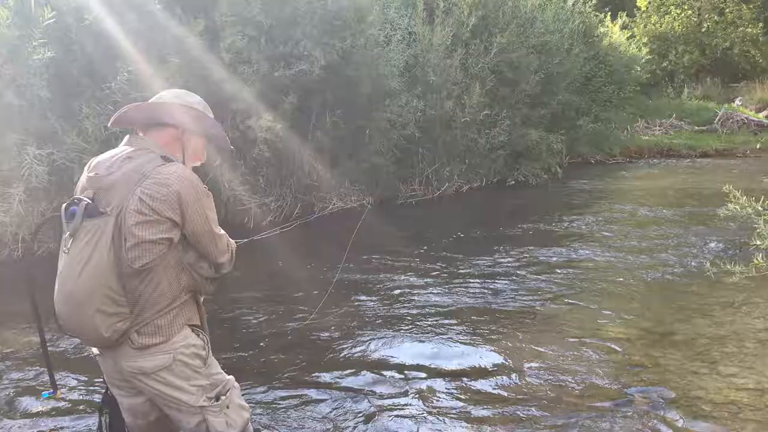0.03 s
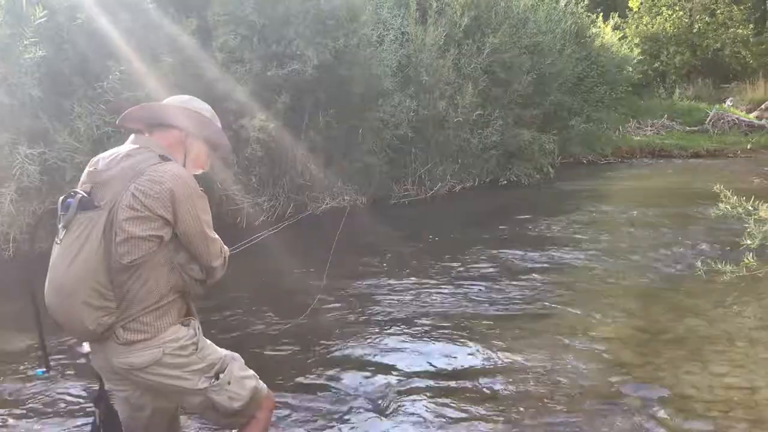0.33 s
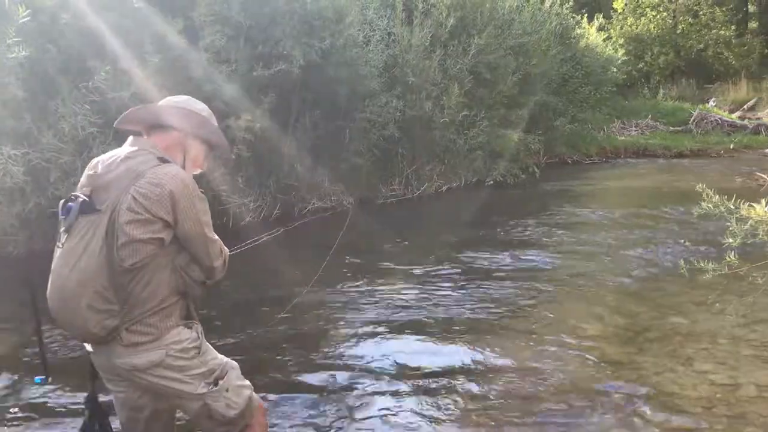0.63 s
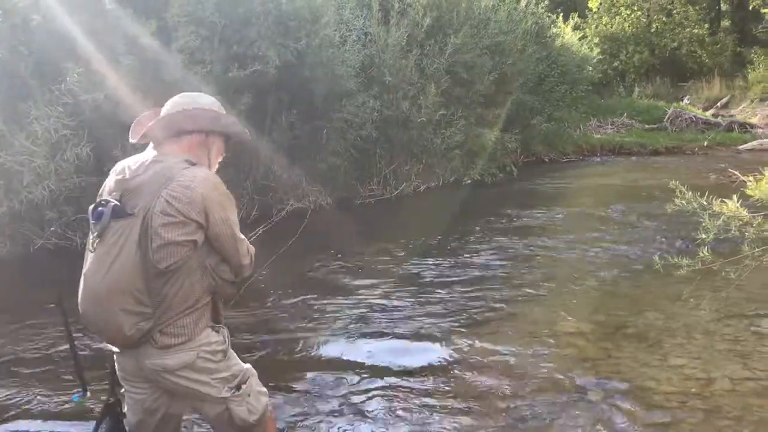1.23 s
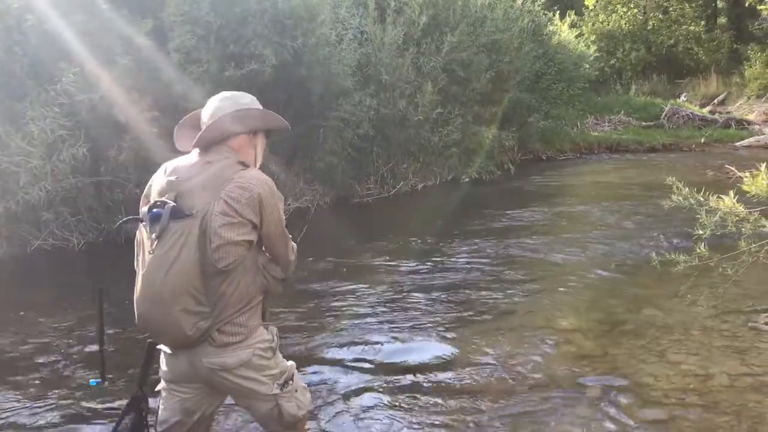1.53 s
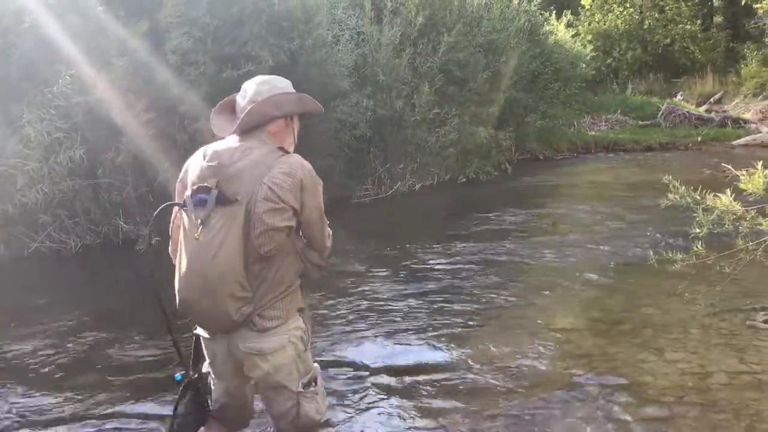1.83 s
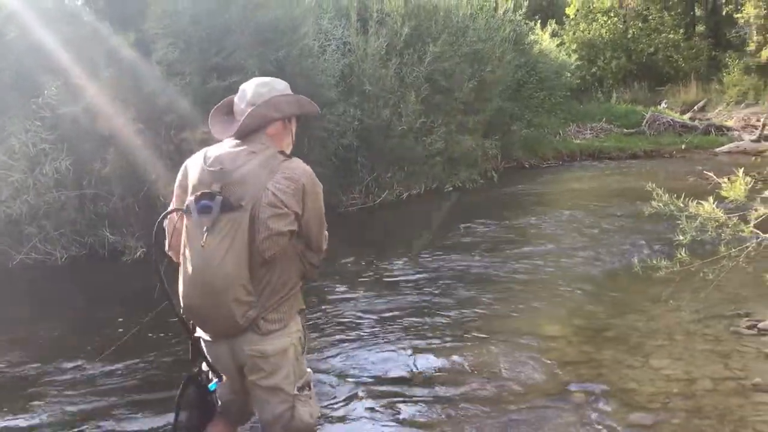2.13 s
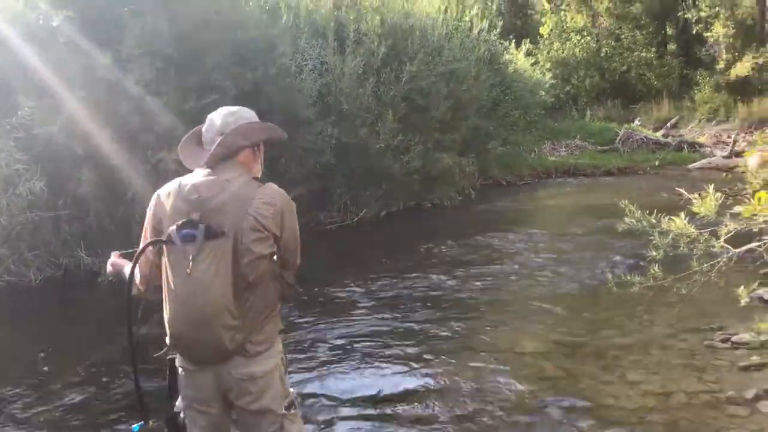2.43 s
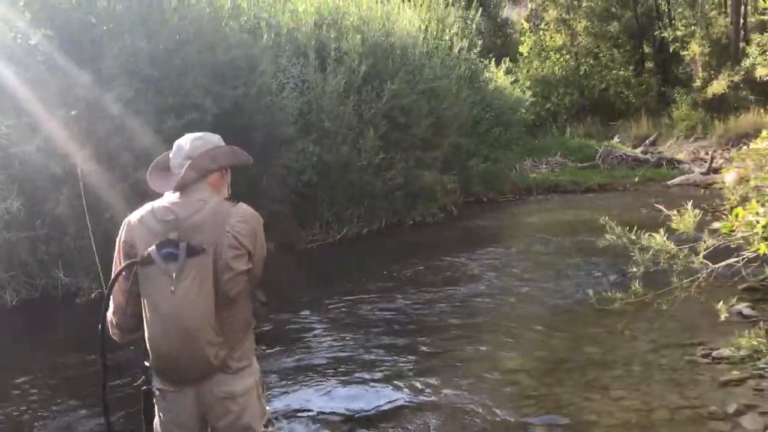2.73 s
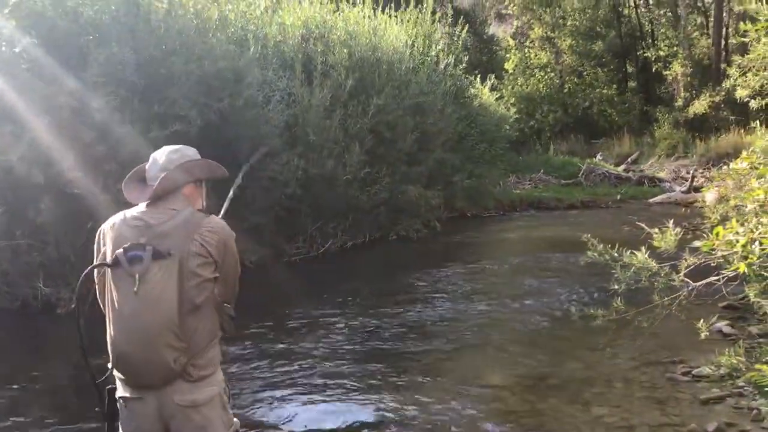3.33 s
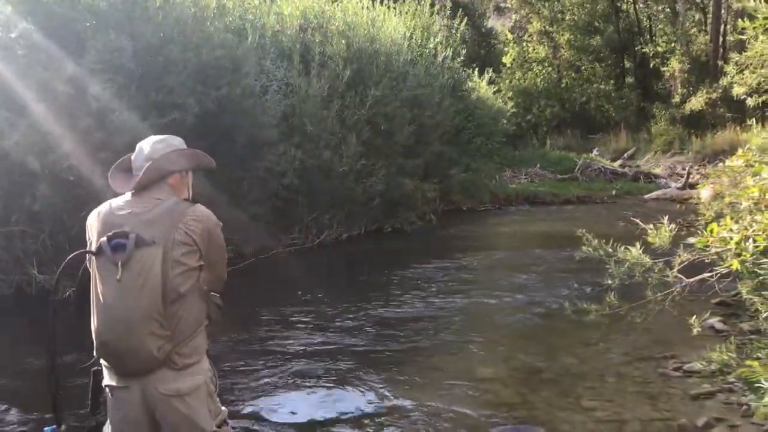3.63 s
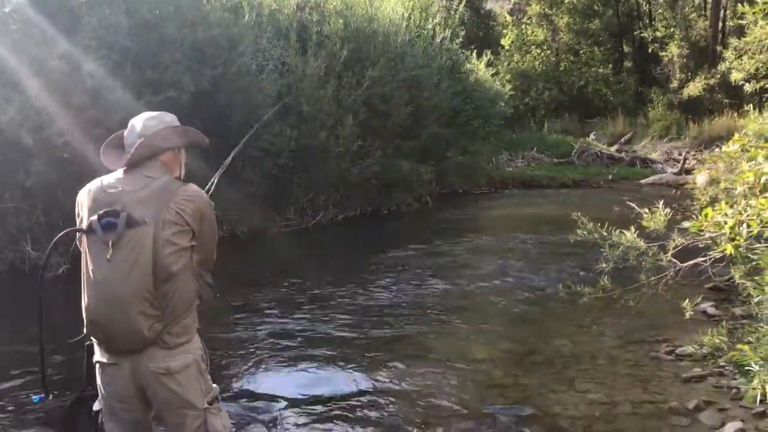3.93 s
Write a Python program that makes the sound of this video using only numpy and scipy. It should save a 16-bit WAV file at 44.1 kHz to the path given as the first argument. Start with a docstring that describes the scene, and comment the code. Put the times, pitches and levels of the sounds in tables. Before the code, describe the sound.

Shallow river water flows close by, bubbling and lightly splashing, with a single knock near the end.

```python
"""Shallow river and a knock

A shallow river rushes past, close by: merged splashes make a bed of fine noise, small bubbles ring in it,
foam crackles on top and a hollow drone sits underneath. Now and then the water plops, spits a drop or
sloshes. Late on, something hard knocks once near the microphone, and the gain ducks and creeps back."""
import sys
import numpy as np
from scipy import signal
from scipy.fft import rfft, irfft
from scipy.io import wavfile

SR = 44100
rng = np.random.default_rng(int(sys.argv[2]) if len(sys.argv) > 2 else 0)


def generate_wav(sig):
    """Save sig (samples, or channels by samples) to the path in sys.argv[1] as 16-bit PCM at SR."""
    pcm = np.round(np.clip(np.atleast_2d(sig).T, -1, 1) * 32767).astype(np.int16)
    wavfile.write(sys.argv[1], SR, pcm)


N = 176400
TIME = np.arange(N) / SR
FREQS = np.maximum(np.arange(N // 2 + 1) * SR / N, 1)

# strength of the current: time_s, level_db
FLOW_LEVEL = [(.12, -48.5), (.3, -47), (.55, -44), (.67, -45.5), (.78, -45.5), (.95, -44.5), (1.1, -47),
              (1.45, -46.5), (1.9, -47.5), (2.2, -47.5), (2.45, -45), (2.75, -46.5), (3.1, -48), (3.4, -48),
              (4, -49)]
# tone colour of the rush: frequency_hz, relative_db
RUSH_SPECTRUM = [(20, -42), (33, -27), (50, -9), (100, -3.5), (150, -19.5), (210, 1.5), (330, -1.5),
                 (480, -5.5), (620, -.5), (1050, 0), (1600, -3), (2500, -7), (4000, -11), (6300, -17.5),
                 (9000, -20.5), (13000, -23), (16000, -30)]
# strength of the small bubbles by pitch: pitch_hz, relative_db
BUBBLE_SPECTRUM = [(300, -5), (600, -1.5), (1100, 0.5), (2500, -3.5), (6000, 2)]
# rise and fall of the foam's crackle: time_s, level_db
FOAM_LEVEL = [(.12, -76), (.55, -56.5), (.95, -56.5), (1.15, -63.5), (1.47, -61), (1.85, -71), (2.05, -58),
              (2.15, -61.5), (2.33, -54.5), (2.7, -57.5), (3.1, -64.5), (3.45, -60.5), (4, -70)]
# resonances of the drone: centre_hz, width_hz, relative_db
DRONE_RESONANCES = [(93.7, 15, -9), (227.5, 51.5, 1)]
# fader over those resonances: time_s, gain_db
DRONE_FADER = [(.12, -62), (.85, -59.5), (1.2, -58.5), (2.1, -60.5), (2.8, -56.5), (3.25, -52),
               (3.45, -52.5), (4, -50.5)]
# single large bubbles: start_s, pitch_hz, level_db, t60_s
LARGE_BUBBLES = [(.177, 601, -41.5, 0.14), (.72, 600, -37, .05), (.812, 206, -38.5, 0.16),
                 (.915, 920, -37, 0.035), (.925, 336, -37, 0.081), (1.615, 312, -31.5, 0.089),
                 (1.688, 1150, -33.5, 0.042), (2.045, 873, -28, 0.047), (2.176, 1000, -34, 0.051),
                 (2.297, 355, -33, 0.083), (2.346, 1130, -35.5, 0.061), (2.37, 293, -32.5, 0.11),
                 (2.39, 385, -36, 0.078), (2.646, 1530, -35, .035), (2.66, 583, -27, 0.035),
                 (2.964, 840, -33.5, 0.043)]
# drops of spray landing: start_s, level_db, centre_hz
SPRAY_DROPS = [(.28, -30.5, 2370), (0.315, -32, 2530), (0.343, -36, 3000), (.447, -34.5, 11000),
               (0.473, -35, 6000), (.546, -27, 5800), (.548, -30.5, 12900), (.573, -53, 6000),
               (.615, -34.5, 4800), (.711, -27, 2500), (0.969, -30.5, 1100), (1.6, -39.5, 9000),
               (1.62, -36, 3000), (1.77, -37, 13800), (2.0, -29.5, 2600), (2.03, -29.5, 3400),
               (2.042, -31, 4000), (2.053, -37, 3700), (3.2, -44, 12000), (3.405, -34, 4000)]
# folding wavelets: start_s, length_s, level_db, centre_hz
WAVELETS = [(0.418, 0.043, -46.5, 1200), (0.542, 0.044, -48.5, 4500), (.555, 0.031, -54, 1200),
            (.71, .07, -47, 1000), (0.854, 0.083, -48, 835), (1.441, 0.038, -49, 1180),
            (2.008, 0.042, -46.5, 1190), (2.285, 0.043, -44, 650), (2.31, .1, -48.5, 3000),
            (2.49, 0.12, -51.5, 440), (2.64, 0.03, -47, 1200)]
# the knock, a graze then the full blow; softer is duller: start_s, force_db, lowpass_hz, crack_db
KNOCK_CONTACTS = [(3.2956, -3.5, 1170, -22), (3.3007, 2.5, 9000, -21)]
# modes of the struck object: pitch_hz, gain_db, t60_s
BODY_MODES = [(250, -21.5, 0.0084), (657, -7.5, 0.012), (980, -9.5, 0.02), (1300, -18, 0.017),
              (1860, -14.5, 0.0092), (2330, -14, 0.0084), (2840, -15.5, 0.01), (3840, -17.5, 0.0088),
              (4250, -16, 0.0069), (5250, -18, 0.0077), (7070, -21.5, 0.0065)]
# dips in the microphone's response: centre_hz, width_hz, gain_db
MIC_NOTCHES = [(4920, 650, -3.5), (7650, 1100, -3), (10500, 690, -4.5)]


def from_db(db):
    """Decibels to gain."""
    return 10 ** (np.asarray(db) / 20)


def rms_one(x):
    """Scale to rms 1."""
    return x / np.sqrt(np.mean(x ** 2) + 1e-20)


def in_time(rows):
    """Read a level curve at every sample."""
    return np.interp(TIME, *np.transpose(rows))


def at_hz(points, hz):
    """Read a spectrum in dB on a log-frequency axis."""
    points_hz, db = np.transpose(points)
    return np.interp(np.log(hz), np.log(points_hz), db)


def noise(gains):
    """Noise coloured by a gain for each frequency, at rms 1."""
    return rms_one(irfft(rfft(rng.standard_normal(N)) * gains, N))


def drift(rate_hz):
    """A random wobble of rms 1, mostly slower than rate_hz."""
    return noise(1 / (1 + (FREQS / rate_hz) ** 2))


def hump(centre_hz, octaves):
    """A band shape whose gain halves this many octaves either side of its centre."""
    return 1 / (1 + (np.log2(FREQS / centre_hz) / octaves) ** 2)


def decay(start_s, t60_s):
    """An envelope that jumps to 1 and dies away."""
    return (TIME >= start_s) * from_db(-60 * np.clip((TIME - start_s) / t60_s, 0, 10))


def ring(clicks, hz, t60_s):
    """A resonator: each click sets off a dying sine."""
    radius, angle = from_db(-60 / (t60_s * SR)), 2 * np.pi * hz / SR
    return signal.lfilter([0, np.sin(angle)], [1, -2 * radius * np.cos(angle), radius ** 2], clicks + 1e-18)


def rush(flow_db, flicker_db=1.69, flicker_hz=18, shared_db=.5, brightening=.2, treble_hz=3000):
    """Countless merged splashes: half-octave bands flicker on their own, and stronger flow is brighter."""
    bed = rfft(noise(from_db(at_hz(RUSH_SPECTRUM, FREQS))))
    band = np.floor(2 * np.log2(np.maximum(FREQS, 150)))
    flutter_db = shared_db * drift(36)   # moves all bands together
    out = 0
    for k in np.unique(band):
        treble_share = 1 / (1 + (treble_hz / 2 ** (k / 2)) ** 2)
        swing_db = brightening * treble_share * (flow_db - flow_db.mean())
        gain = from_db(swing_db + flutter_db + flicker_db * drift(flicker_hz))
        out += gain * irfft(bed * (band == k), N)
    return from_db(flow_db) * rms_one(out)


def bubbles(flow_db, per_s=330, relative_db=-6.5, spread_db=2, t60_cycles=15, pitches=40):
    """Small bubbles are born at random, and each rings for a few cycles at its own pitch."""
    strengths = from_db(spread_db * np.minimum(rng.exponential(1, N), 4)) * rng.choice([-1, 1], N)
    births = strengths * (rng.random(N) < per_s / SR)
    pitch_index = rng.integers(0, pitches, N)
    out = 0
    for k, hz in enumerate(np.geomspace(300, 6000, pitches)):
        out += from_db(at_hz(BUBBLE_SPECTRUM, hz)) * ring(births * (pitch_index == k), hz, t60_cycles / hz)
    return from_db(flow_db + relative_db) * rms_one(out)


def foam(clicks_per_s=600, centre_hz=4500):
    """Foam bursts in a crackle of tiny bright clicks."""
    clicks = rng.standard_normal(N) * (rng.random(N) < clicks_per_s / SR)
    colour = 1 / (FREQS / centre_hz + centre_hz / FREQS)
    return from_db(in_time(FOAM_LEVEL)) * rms_one(irfft(rfft(clicks) * colour, N))


def drone():
    """Noise in two low resonances wavers beneath the rush, hollow and growing toward the end."""
    hollow = sum(from_db(db) * noise(1 / (1 + ((FREQS - hz) / width_hz) ** 2) ** 2)
                 for hz, width_hz, db in DRONE_RESONANCES)
    return from_db(in_time(DRONE_FADER)) * hollow


def plops(attack_s=.0018, rise_per_t60=.17):
    """Large bubbles ring and rise in pitch as they near the surface."""
    out = 0
    for start_s, hz, db, t60_s in LARGE_BUBBLES:
        age_s = np.maximum(TIME - start_s, 0)
        phase = 2 * np.pi * hz * age_s * (1 + .5 * rise_per_t60 * age_s / t60_s)
        envelope = (1 - np.exp(-age_s / attack_s)) * decay(start_s, t60_s)
        out += from_db(db) * envelope * np.sin(phase)
    return out


def spray(t60_s=.018, trim_db=-7.5):
    """Drops land with short ticks of noise, each around its own pitch."""
    return sum(from_db(db + trim_db) * decay(start_s, t60_s) * noise(hump(hz, octaves=.22))
               for start_s, db, hz in SPRAY_DROPS)


def sloshes(roughness_db=3):
    """Wavelets fold over: short rough swells of noise, each around its own pitch."""
    out = 0
    for start_s, length_s, db, hz in WAVELETS:
        progress = np.clip((TIME - start_s) / length_s, 0, 1)
        swell = np.sqrt(np.abs(np.sin(np.pi * progress)))
        colour = hump(hz, octaves=.86) / np.sqrt(1 + FREQS / hz)
        out += from_db(db) * swell * noise(colour)
    return out * from_db(roughness_db * drift(90))


def knock(crack_t60_s=.0074, crack_top_hz=12000):
    """Two contacts a few milliseconds apart strike heavily damped modes, each with a tiny crack."""
    force, crack_envelope = 0, 0
    for start_s, force_db, lowpass_hz, crack_db in KNOCK_CONTACTS:
        impulse = from_db(force_db) * (np.arange(N) == int(start_s * SR))
        softness = signal.butter(2, lowpass_hz, fs=SR, output="sos")
        force += signal.sosfilt(softness, impulse + 1e-18)
        crack_envelope += from_db(crack_db) * decay(start_s, crack_t60_s)
    body = sum((-1) ** k * from_db(db) * ring(force, hz, t60_s)   # modes alternate in polarity
               for k, (hz, db, t60_s) in enumerate(BODY_MODES))
    return body + crack_envelope * noise(1 / (1 + (FREQS / crack_top_hz) ** 4))


def ducking(x, threshold_db=-23.5, slope=.16, attack_s=.025, release_db_per_s=12):
    """Loud peaks pull the gain down; it creeps back at a steady rate."""
    level_db = 20 * np.log10(np.abs(x) + 1e-9)
    cut_db = slope * np.maximum(level_db - threshold_db, 0)
    recovery_db = release_db_per_s * TIME
    held_db = np.maximum.accumulate(cut_db + recovery_db) - recovery_db
    pole = np.exp(-1 / (attack_s * SR))
    return x * from_db(-signal.lfilter([1 - pole], [1, -pole], held_db))


def scene():
    """The river bed, its splashy accents and the knock, mixed in mono."""
    flow_db = in_time(FLOW_LEVEL)
    river = rush(flow_db) + bubbles(flow_db) + foam() + drone()
    accents = sloshes() + plops() + spray()
    return (river + accents + knock())[None]


def record(dry, silence_s=.12, cutoff_hz=15850):
    """Microphone colour, ducking, a moment of silence at the head and a steep top cut."""
    colour_db = sum(db / (1 + (2 * (FREQS - hz) / width_hz) ** 2) for hz, width_hz, db in MIC_NOTCHES)
    coloured = irfft(rfft(dry[0]) * from_db(colour_db), N)
    gated = ducking(coloured) * (TIME >= silence_s)
    top_cut = signal.ellip(10, .1, 80, cutoff_hz, fs=SR, output="sos")
    return signal.sosfilt(top_cut, gated)[None]


dry = scene()
out = record(dry)
generate_wav(out)
```